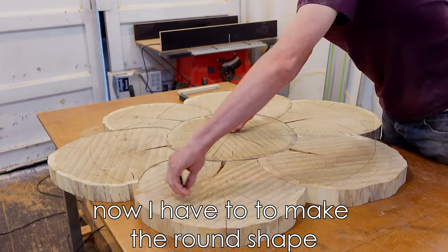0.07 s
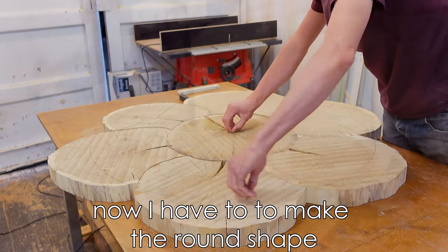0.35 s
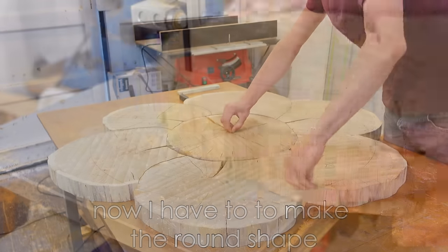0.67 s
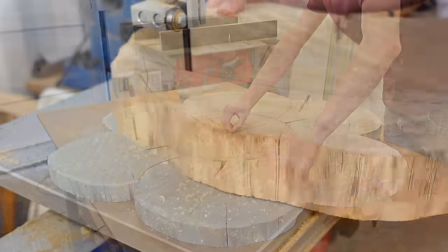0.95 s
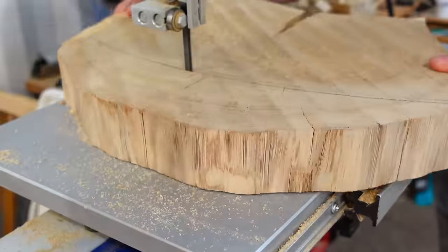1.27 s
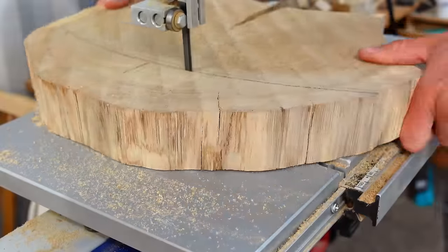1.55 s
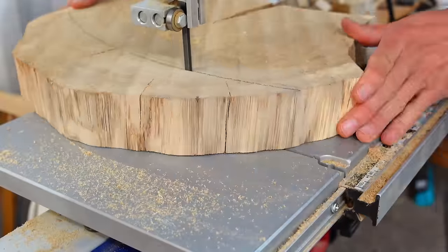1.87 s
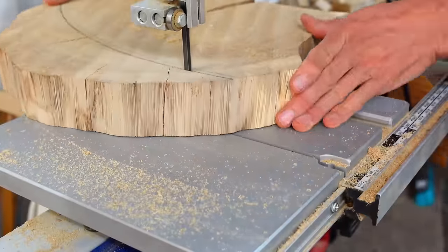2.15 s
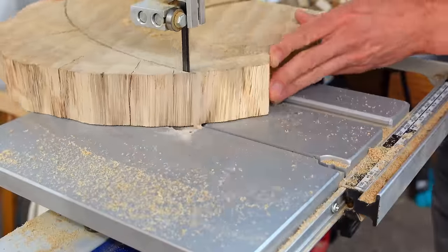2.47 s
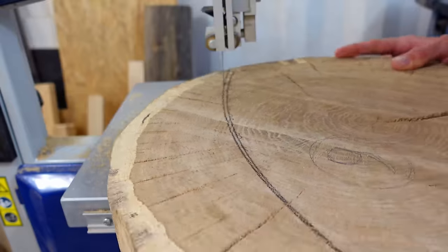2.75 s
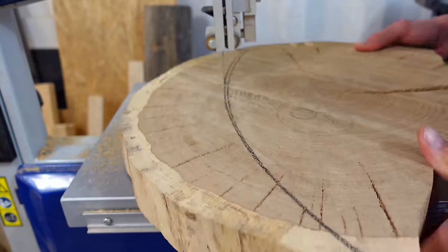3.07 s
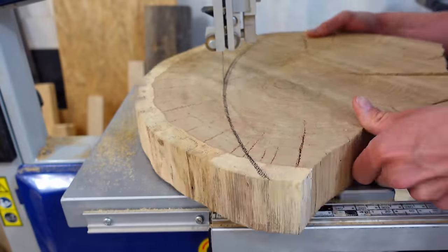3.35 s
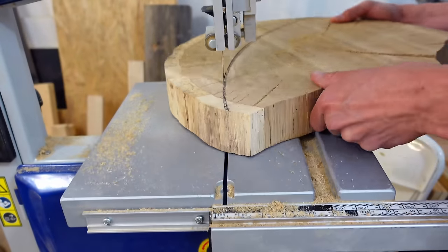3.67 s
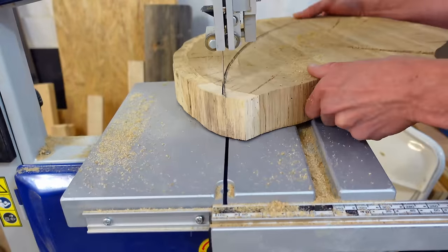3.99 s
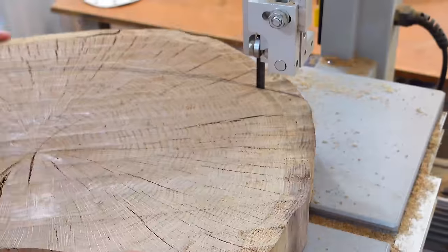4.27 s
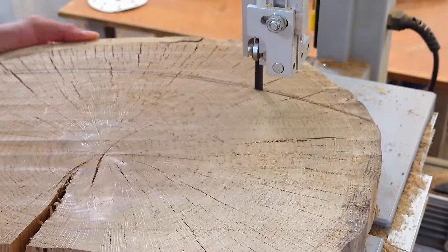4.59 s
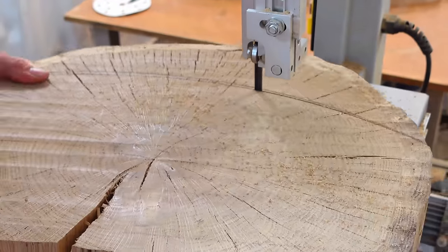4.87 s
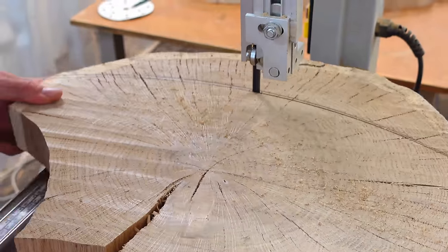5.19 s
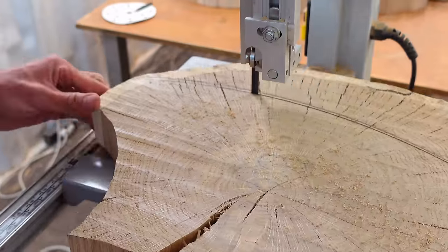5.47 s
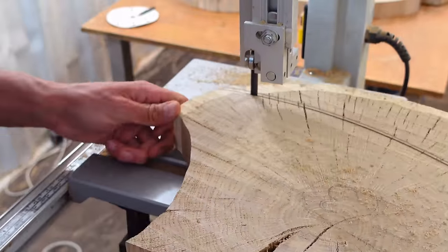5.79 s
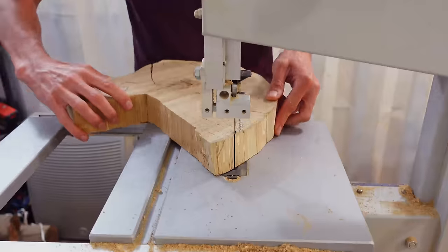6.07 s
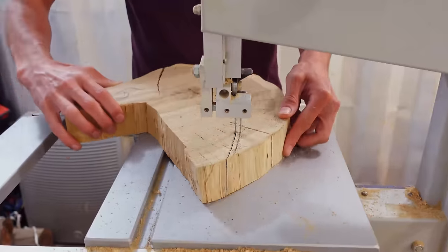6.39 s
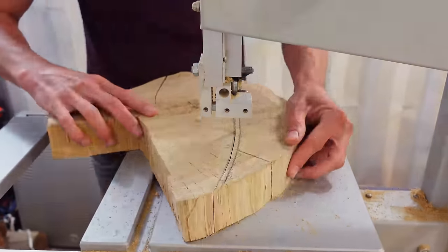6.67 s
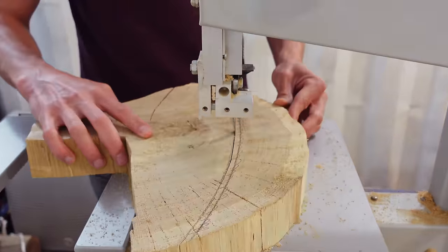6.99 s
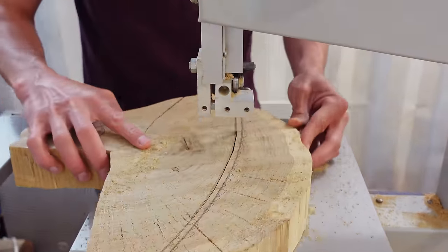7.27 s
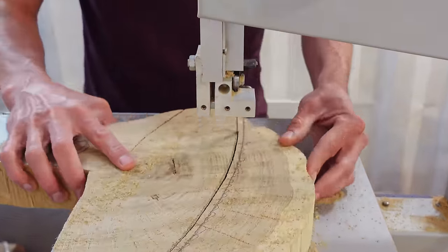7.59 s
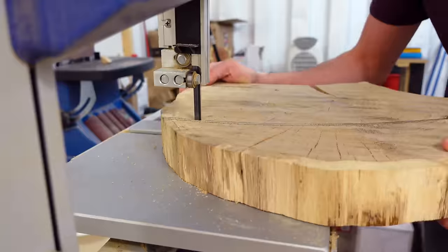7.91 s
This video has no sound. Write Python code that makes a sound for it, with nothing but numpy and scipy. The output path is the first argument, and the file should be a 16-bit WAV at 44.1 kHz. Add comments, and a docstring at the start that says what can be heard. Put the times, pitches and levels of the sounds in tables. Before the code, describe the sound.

After faint pencil taps and wood scuffs, a band saw tears steadily through thick wood, whining, rasping and briefly screeching.

```python
"""Pencil work and a band saw

In a workshop a pencil knocks, rubs and squeaks on wooden slabs, and wood scuffs lightly. Then a band
saw cuts a thick slab: its teeth tear fibres in a dense train of impulses that drives table and housing
into forced vibration. The machine whines, and the steel blade, excited by friction, sings in its
guides, rasps in the kerf and squeals where the kerf pinches it."""
import sys
import numpy as np
from scipy import signal
from scipy.fft import rfft, irfft
from scipy.io import wavfile

SR = 44100
rng = np.random.default_rng(int(sys.argv[2]) if len(sys.argv) > 2 else 0)


def dump(signal):
    """Clip the signal to [-1, 1] and save it as 16-bit WAV at the path in sys.argv[1]."""
    limited = np.clip(np.atleast_2d(signal).T, -1, 1)
    pcm = np.round(limited * 32767).astype(np.int16)
    wavfile.write(sys.argv[1], SR, pcm)


N = 358974
TIME = np.arange(N) / SR
FREQ = np.maximum(np.arange(N // 2 + 1) * SR / N, 1)
ENTRY_S, RUN_UP_S = 1.155, 1.18  # the teeth meet the wood; the tones start to climb
DEEP_FROM_S, DEEP_TO_S = 2.12, 7.91  # the teeth bite deep

# Spectral envelope of the cut: frequency_hz, gain_db
CUT_SPECTRUM = [(30, -27), (80, -23), (135, -5.5), (190, -1), (380, -0.5), (760, 3.5), (1040, -3.5),
                (1500, -0.5), (3300, 3), (7500, 0.5), (10000, -2), (11800, -7), (15800, -11.5)]
# Resonances of table and housing: frequency_hz, bandwidth_hz, gain_db
HOUSING_MODES = [(284, 43, 4), (563, 110, 3.5), (882, 58, 6), (1293, 520, 5), (5960, 310, 3.5)]
# Strength of the tearing fibres: time_s, level_db
TEARING_LEVEL = [(1.2, -34), (2.1, -36), (2.55, -37.5), (2.62, -35), (4.3, -33.5), (5.6, -31), (5.9, -34.5),
                 (6.1, -33), (8.14, -31)]
# Rumble added by the deep bite as the push varies: time_s, gain_db
BITE_RUMBLE = [(2.2, 8.5), (2.7, 10.5), (3.3, 8), (4.2, 9), (4.9, 10.5), (5.3, 12.5), (5.6, 7.5), (5.8, 11),
               (6.5, 10.5), (7.9, 9.5)]

def cutting(deep, grain_db=1.5, surge_db=0.9, crossovers_hz=(420, 1300, 6200)):
    """Forced vibration: snapping fibres shake table and slab, and dust hisses, more in a deep bite."""
    tear_db, = curves(TEARING_LEVEL)
    bite_db, = curves(BITE_RUMBLE)
    shake_db = bite_db * deep - pinch_loss_db()
    ticks = noise() * undb(grain_db * walk(1600) + surge_db * walk(14))
    ticks = ticks + undb(-14) * reverberation(ticks, t60=.06)  # the steel's many close modes
    housing_db = sum(db * abs(resonance(hz, width)) ** 2 for hz, width, db in HOUSING_MODES)
    body = colour(CUT_SPECTRUM) * undb(housing_db)
    low, middle, upper = (1 / (1 + (FREQ / hz) ** 8) for hz in crossovers_hz)
    rumble = shaped(ticks, body * low) * undb(-56 + shake_db + 1.1 * walk(5))
    slab = shaped(ticks, body * (middle - low)) * undb(-44 + .52 * shake_db + 1.32 * walk(6.2))
    tearing = shaped(ticks, body * (upper - middle)) * undb(tear_db - .22 * pinch_loss_db())
    dust = shaped(ticks, body * (1 - upper)) * undb(-39.5 + 6 * deep + .2 * walk(2.9))
    return rumble + slab + tearing + dust


# Rubbing of the blade on the side of the kerf: time_s, level_db
RASP_LEVEL = [(2.56, -48), (2.63, -40), (3.0, -37.5), (3.4, -40.5), (3.8, -35.5), (4.5, -38.5), (5.3, -43),
              (5.95, -47), (6.05, -36.5), (6.6, -36), (6.85, -39), (8.14, -51)]

def kerf_rasp(centre_hz=2216, bandwidth_hz=1150):
    """Sliding friction: the blade rubs the kerf wall and gives a broad band of noise."""
    level_db, = curves(RASP_LEVEL)
    band = abs(resonance(centre_hz, bandwidth_hz)) ** 2
    return shaped(noise(), band) * undb(level_db + 2 * walk(22))


# Resonances of the blade in a light bite: frequency_hz, bandwidth_hz, gain_db
FREE_MODES = [(1300, 86, 0.5), (1730, 160, 1), (3400, 200, 3.5), (5230, 1050, 0.5)]

def free_ring(growth_db_per_s=1):
    """Resonance under random excitation: the lightly loaded blade rings in bands of noise."""
    steel = sum(undb(db) * abs(resonance(hz, width)) ** 2 for hz, width, db in FREE_MODES)
    return shaped(noise(), steel) * undb(-39.5 + growth_db_per_s * (TIME - ENTRY_S))


# Modes that sound throughout the cut: pitch_hz, entry_level_db, decay_db_per_s
STEADY_MODES = [(1960, -44.5, 0.6), (4690, -45.5, 4), (8000, -53, -0.5), (9280, -47.5, 1.5)]
# Spells in which one mode sings out: start_s, end_s, pitch_hz, level_db
SINGING_SPELLS = [(1.23, 1.41, 1978, -33.5), (1.52, 1.69, 1970, -38), (1.24, 1.37, 4640, -39),
                  (1.3, 2.2, 9320, -41), (1.46, 1.82, 4663, -38), (1.93, 2.07, 9309, -36.5),
                  (1.91, 2.16, 2021, -37), (2.1, 2.95, 1964, -38), (2.55, 2.84, 9292, -43),
                  (3.3, 3.7, 1958, -38), (4.22, 4.78, 4656, -42), (5.45, 5.75, 4670, -42),
                  (4.85, 5.1, 9323, -41), (5.26, 5.48, 9320, -42), (5.73, 6.05, 9329, -36),
                  (6.02, 6.39, 4683, -41.5), (6.5, 6.93, 4675, -38), (6.8, 7.17, 4660, -34),
                  (6.68, 7.16, 9312, -36.5), (7.86, 8.25, 4682, -39), (7.3, 8.4, 9340, -44)]

def blade_song(flat_share=.15, settle_s=.036, build_s=.023, wander_db=2, bend_share=.0023):
    """Self-excited oscillation: modes sing on; at times one grows, saturates, pulls sharp and dies."""
    out = np.zeros(N)
    run_up = 1 - flat_share * np.exp(-np.maximum(TIME - RUN_UP_S, 0) / settle_s)
    for hz, db, decay in STEADY_MODES:
        level_db = db - decay * (TIME - ENTRY_S) + wander_db * flutter(TIME, 9.9)
        pitch_hz = hz * run_up * (1 + .002 * flutter(TIME, 5))
        # a loud spell takes over from the faint tone at its pitch
        taken = sum(swell(TIME, (start + end) / 2, end - start)
                    for start, end, sung_hz, _ in SINGING_SPELLS if abs(sung_hz / hz - 1) < .05)
        out += oscillation(pitch_hz, level_db, waver_hz=11.35, shake_db=3) * np.maximum(1 - taken, 0)
    out *= held(RUN_UP_S, np.inf, build_s)
    for start, end, hz, db in SINGING_SPELLS:
        part = span(start, end)
        arch = swell(TIME[part], (start + end) / 2, end - start)
        pitch_hz = hz * (1 + bend_share * (arch - arch.mean()))
        sputters = start < DEEP_FROM_S and hz > 4000  # high modes drop out in the first light bite
        dips_db = (6 if sputters else 1) * np.minimum(flutter(TIME[part], 40), 0)
        tone = oscillation(pitch_hz, db + dips_db, waver_hz=.004 * hz, shake_db=2, shake_hz=140)
        out[part] += np.tanh(4 * arch) * tone
    return out


# Tone of the machine: time_s, pitch_hz, level_db
WHINE_PATH = [(1.235, 675, -26.5), (1.31, 621, -40), (1.55, 658.7, -29.5), (2.1, 643, -30.5),
              (2.17, 626, -38), (2.55, 621, -37), (2.65, 622, -47.5), (4.2, 630.3, -45.5),
              (4.8, 666.5, -37.5), (5.7, 654.3, -41.5), (5.92, 657.5, -31.5), (6.1, 664.4, -37),
              (6.95, 646, -41), (7.2, 661.7, -35), (8.14, 683, -35)]

def machine_whine(flat_share=.47, settle_s=.022, pinch_share=.71, rough_db=1):
    """Exponential run-up: the tone climbs to pitch, roughened by random amplitude modulation."""
    hz, db = curves(WHINE_PATH)
    lag = np.exp(-np.maximum(TIME - RUN_UP_S, 0) / settle_s)
    pitch_hz = hz * (1 - flat_share * lag)
    tone = oscillation(pitch_hz, db - pinch_share * pinch_loss_db(), waver_hz=2.97, shake_db=1.55)
    return (1 - lag) ** 2 * tone * undb(rough_db * walk(171))


# The blade catches and judders or squeals: middle_s, length_s, pitch_hz, spread_hz, level_db
CATCHES = [(1.176, 0.032, 335, 30, -29.5), (2.755, 0.076, 2840, 90, -36), (3.27, .4, 3150, 50, -42),
           (3.217, 0.56, 854, 260, -38), (4.046, 0.28, 826, 220, -37.5), (4.268, 0.1, 2515, 260, -32),
           (4.81, 0.1485, 2568, 600, -34), (6.288, 0.13, 261.7, 25, -38), (6.615, 0.076, 2314, 180, -34),
           (6.698, 0.072, 2226, 70, -29)]
# The kerf closes on the blade: middle_s, length_s, screech_db, rumble_loss_db
KERF_PINCHES = [(5.007, 0.1, -28.5, 5.5), (5.149, 0.27, -29.5, 14.5), (5.524, 0.093, -28.5, 6)]
# Modes of the pinched blade: pitch_hz, spread_hz, gain_db
SCREECH_MODES = [(2810, 320, -7), (3510, 170, -11), (4240, 370, -8), (7320, 540, -9), (9430, 1400, -8),
                 (12200, 540, -19)]

def squeals(small_db=-43.5, small_count=28):
    """Friction-induced vibration: a catch rings around one pitch, a pinch in all the screech modes."""
    screeches = [(middle, length, hz, spread, db + mode_db)
                 for middle, length, db, _ in KERF_PINCHES for hz, spread, mode_db in SCREECH_MODES]
    small_catches = [(4.2 + 3.7 * when, .12, 1600 * 1.9 ** height, 350, small_db + 4 * strength)
                     for when, height, strength in rng.random((small_count, 3))]
    out = np.zeros(N)
    for middle, length, hz, spread, db in CATCHES + screeches + small_catches:
        part = span(middle - length / 2, middle + length / 2)
        envelope = undb(db) * np.sqrt(swell(TIME[part], middle, length))
        out[part] += envelope * stutter(TIME[part], hz, spread)
    return out


def pinch_loss_db():
    """Loss of excitation: a pinched blade screeches instead of cutting, so the rumble drops."""
    return sum(loss * np.sqrt(swell(TIME, middle, length)) for middle, length, _, loss in KERF_PINCHES)


# Long rasps of the binding blade: spread_hz, path of (time_s, pitch_hz, level_db)
BINDING_GLIDES = [(326.4, [(2.59, 2380, -39), (3.0, 2280, -38), (3.05, 1905, -37), (3.17, 1800, -39.5),
                  (3.2, 1520, -39), (3.42, 1397, -48)]), (299, [(4.97, 2880, -45), (5.11, 2695, -32),
                  (5.14, 2120, -31), (5.2, 2100, -34), (5.24, 2250, -29.5)]), (550, [(7.54, 2008, -34),
                  (7.66, 1870, -34), (7.72, 1520, -37)])]

def binding():
    """Sustained friction: the blade twists in the curved kerf and rasps, sliding down in pitch."""
    out = np.zeros(N)
    for spread, path in BINDING_GLIDES:
        hz, db = curves(path)
        part = span(path[0][0], path[-1][0])
        out[part] += undb(db[part]) * stutter(TIME[part], hz[part], spread)
    return out


# Pencil knocks on the slabs: start_s, level_db, t60_s
IMPACTS = [(0.205, -47.5, 0.31), (.366, -57, 0.7), (.425, -54.5, 0.67)]
# Resonances of the slabs: frequency_hz, bandwidth_hz, gain_db
SLAB_MODES = [(614, 90, -9), (853, 65, -2), (1220, 96, -2), (1576, 150, 1.5), (2000, 220, -3),
              (2350, 260, -5.5), (3540, 460, -12.5), (10200, 1300, -21)]

def pencil_knocks(skirt=1.34, contact_db=-2, contact_s=.015):
    """Impact excitation: brief contacts and one faint rub set the slab's damped modes rattling."""
    envelope = undb(-53.5) * swell(TIME, middle=.22, length=.19)  # the rub
    for start, db, t60 in IMPACTS:
        contact = undb(contact_db) * swell(TIME, start + contact_s / 3, contact_s)
        decay = undb(-60 * np.maximum(TIME - start, 0) / t60)
        envelope += undb(db) * (contact + decay) * (TIME > start)
    power = sum((undb(db) * abs(resonance(hz, width)) ** skirt) ** 2 for hz, width, db in SLAB_MODES)
    return shaped(rng.standard_normal((2, N)), np.sqrt(power)) * envelope


# Squeaking strokes of the pencil: start_s, end_s, level_db
STROKES = [(0.506, 0.546, -48.5), (0.565, 0.594, -53), (0.597, 0.666, -36.5)]
# Harmonics 2 to 4 in the hardest stroke: gain_db
HARMONICS_DB = [-14, -14.5, -29]

def pencil_squeak(pitch_hz=3620, ramp_s=.0058, shake_db=3, jitter_rad=.24):
    """Stick-slip of pencil on wood: nearly pure when light, richer in harmonics when pressed."""
    press = sum(undb(db) * held(start, end, ramp_s) for start, end, db in STROKES)
    phase = 2 * np.pi * np.cumsum(pitch_hz * (1 + .007 * flutter(TIME, 300))) / SR
    phase += jitter_rad * flutter(TIME, 1000)  # each slip comes a little early or late
    overtones = sum(undb(db) * np.sin(k * phase) for k, db in enumerate(HARMONICS_DB, 2))
    tone = np.sqrt(2) * (np.sin(phase) + overtones * press / press.max())
    return tone * press * undb(shake_db * flutter(TIME, 300))


# Dry slides of wood: middle_s, length_s, level_db
SLIDES = [(0.442, 0.078, -53.5), (0.831, 0.022, -51), (0.853, 0.038, -38.5), (0.92, 0.048, -64),
          (0.993, 0.041, -50.5), (1.039, 0.056, -53.5), (1.109, 0.043, -46)]
# Spectral envelope of a slide: frequency_hz, gain_db
SLIDE_SPECTRUM = [(40, -20), (260, 8), (500, 0.5), (1100, -1), (3000, -5), (8000, -13.5), (15000, -23)]

def wood_scuffs(grain_db=3):
    """Friction: short gritty slides, the later ones over faint steady background noise near the saw."""
    strokes = sum(undb(db) * swell(TIME, middle, length) for middle, length, db in SLIDES)
    background = undb(-58) * held(.822, 1.2, .002)
    grit = noise() * undb(grain_db * walk(1100))
    return shaped(grit, colour(SLIDE_SPECTRUM)) * (strokes + background)


# Spectral envelope of the quiet workshop: frequency_hz, gain_db
AIR_SPECTRUM = [(30, -15), (170, -2.5), (400, -9.5), (1500, -13.5), (5000, -22), (15000, -29)]

def room_air(start_db=-58.5, fade_db_per_s=5):
    """Diffuse ambient noise, uncorrelated left and right, that sinks away."""
    air = shaped(rng.standard_normal((2, N)), colour(AIR_SPECTRUM))
    return air * undb(start_db - fade_db_per_s * TIME)


def reverberation(x, t60):
    """Diffuse decay: a dense exponential tail, as strong as its source."""
    t = TIME[:SR // 2]
    tail = rng.standard_normal(len(t)) * undb(-60 * t / t60) * (t > .003)
    return signal.fftconvolve(x, tail / np.linalg.norm(tail))[:N]


def oscillation(hz, db, waver_hz, shake_db, shake_hz=45):
    """Random modulation: a tone's pitch and level shake with the uneven pull of the grain."""
    t = TIME[:len(db)]
    phase = 2 * np.pi * np.cumsum(hz + waver_hz * flutter(t, shake_hz)) / SR
    return np.sqrt(2) * np.sin(phase) * undb(db + shake_db * flutter(t, shake_hz))


def stutter(t, hz, spread_hz, gap_s=.006, ring_s=.04):
    """Superposition of tooth catches, each a short ring on its own pitch around hz; rms 1."""
    width_hz = min(.05 * np.mean(hz), spread_hz / 2)
    centre_hz = np.broadcast_to(hz, t.shape)
    out = np.zeros(len(t))
    for i in range(0, len(t), int(gap_s * SR)):
        near = abs(t - t[i]) < ring_s / 2
        pitch_hz = centre_hz[i] + spread_hz * (rng.random() - .5)
        amplitude = flutter(t[near], width_hz) + 1j * flutter(t[near], width_hz)
        ring = amplitude * np.exp(2j * np.pi * pitch_hz * t[near])
        out[near] += undb(2 * rng.standard_normal()) * swell(t[near], t[i], ring_s) * ring.real
    return unit(out)


def resonance(hz, width):
    """Complex response of a damped oscillator, 1 at its centre."""
    return 1 / (1 + 1j * (FREQ ** 2 - hz ** 2) / (FREQ * width))


def colour(points):
    """Spectral envelope through (frequency_hz, gain_db) points."""
    hz, db = np.transpose(points)
    return undb(np.interp(np.log(FREQ), np.log(hz), db))


def shaped(x, gain):
    """Linear filtering by a gain over frequency; rms 1."""
    return unit(irfft(rfft(x) * gain, N))


def noise():
    """White noise."""
    return rng.standard_normal(N)


def walk(rate):
    """Low-pass noise that changes about rate times a second; rms 1."""
    count = min(int(6 * rate * N / SR) + 2, len(FREQ))
    real, imaginary = rng.standard_normal((2, count))
    return unit(irfft((real + 1j * imaginary) / (1 + (FREQ[:count] / rate) ** 4), N))


def flutter(t, rate):
    """Linear interpolation of random levels, rate of them a second."""
    steps = (t - t[0]) * rate
    levels = rng.standard_normal(int(steps[-1]) + 2)
    return np.interp(steps, np.arange(len(levels)), levels)


def curves(table):
    """Linear interpolation of each later column over the times in the first."""
    times, *columns = np.transpose(table)
    return [np.interp(TIME, times, column) for column in columns]


def swell(t, middle, length):
    """Raised-cosine envelope, 0 to 1."""
    out = np.zeros(len(t))
    inside = span(middle - length / 2, middle + length / 2, t)
    out[inside] = np.cos(np.pi * (t[inside] - middle) / length) ** 2
    return out


def held(start, end, ramp_s):
    """Trapezoidal envelope, 0 to 1."""
    return np.clip(np.minimum(TIME - start, end - TIME) / ramp_s, 0, 1)


def span(start, end, t=TIME):
    """The samples between two times."""
    return slice(*np.searchsorted(t, [start, end]))


def undb(db):
    """Decibels to amplitude ratio."""
    return 10 ** (np.asarray(db) / 20)


def unit(x):
    """Normalisation to rms 1."""
    return x / np.sqrt(np.mean(x ** 2))


# Stereo width of saw and scuffs, as a filter on the side signal: frequency_hz, gain_db
SIDE_SPECTRUM = [(60, -12), (160, -49), (380, -35.5), (700, -10.5), (2000, -9.5), (8000, -8)]

def scene(lean_db=-17, pencil_db=2.5, echo_db=-10):
    """Mid-side superposition: diffuse pencil work; a close saw, bass central, treble wide and leftish."""
    scuffs = wood_scuffs()
    deep = held(DEEP_FROM_S, DEEP_TO_S, ramp_s=.02)
    engaged = held(ENTRY_S, np.inf, ramp_s=.019)
    cut = (cutting(deep) + kerf_rasp() + free_ring() * (1 - deep)) * engaged
    mid = scuffs + cut + squeals() + binding() + blade_song() + machine_whine()
    side = reverberation(mid, t60=.33) + undb(lean_db) * mid
    side = irfft(rfft(side) * colour(SIDE_SPECTRUM), N)
    squeak = signal.hilbert(pencil_squeak())  # reflections put left and right a quarter cycle apart
    pencil = pencil_knocks() + np.array([squeak.real, squeak.imag])
    air = room_air()
    echoes = np.array([reverberation(channel, t60=.27) for channel in pencil])
    distant_pencil = undb(pencil_db) * (pencil + undb(echo_db) * echoes)
    return np.array([mid + side, mid - side]) + distant_pencil + air


def record(dry, cutoff_hz=15800):
    """Band limiting: an elliptic low-pass cuts the top steeply."""
    return signal.sosfilt(signal.ellip(12, .1, 80, cutoff_hz, fs=SR, output="sos"), dry)


dry = scene()
out = record(dry)
dump(out)
```